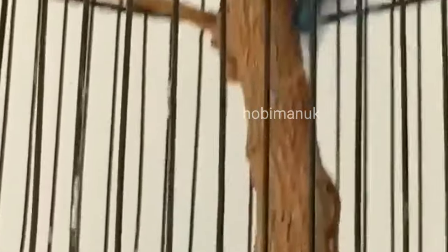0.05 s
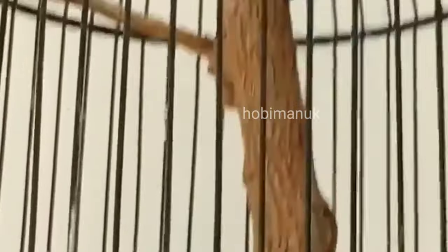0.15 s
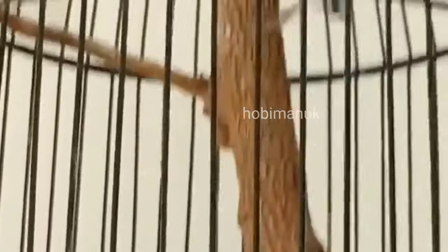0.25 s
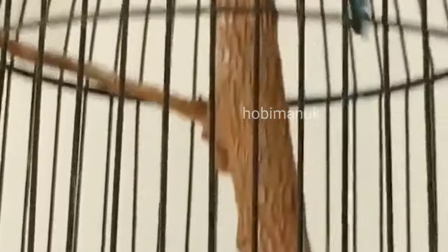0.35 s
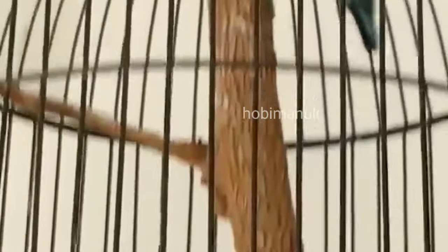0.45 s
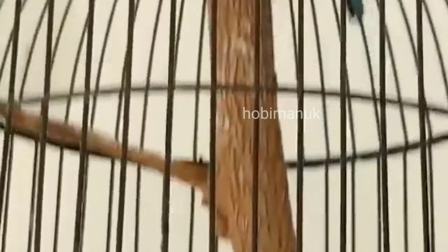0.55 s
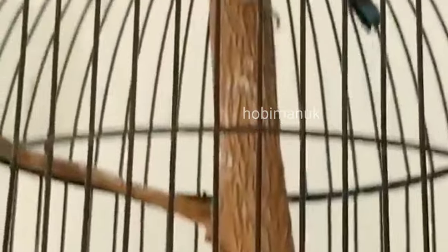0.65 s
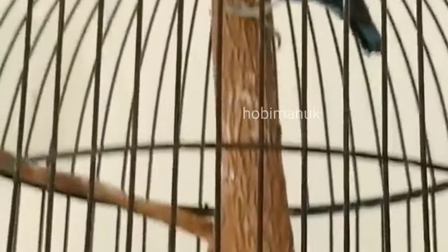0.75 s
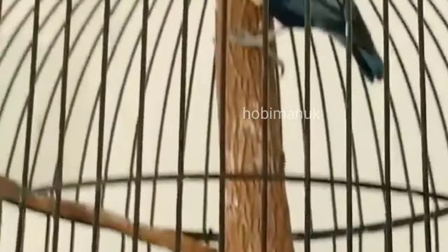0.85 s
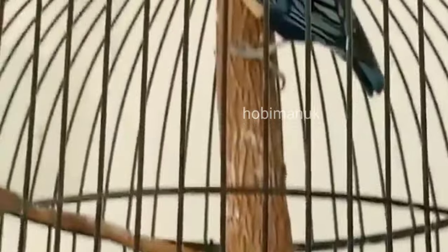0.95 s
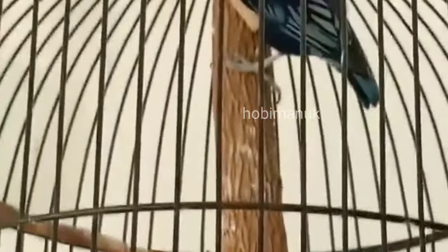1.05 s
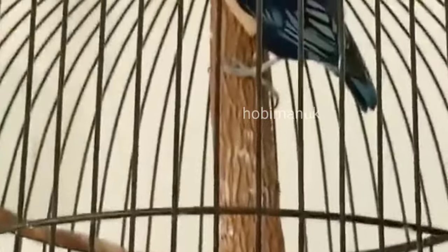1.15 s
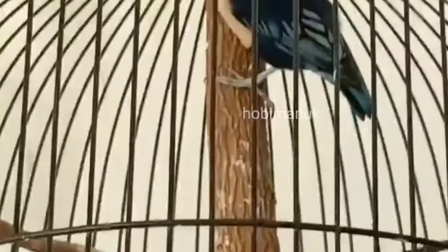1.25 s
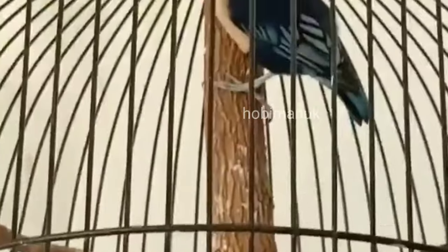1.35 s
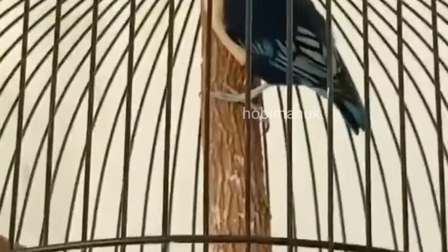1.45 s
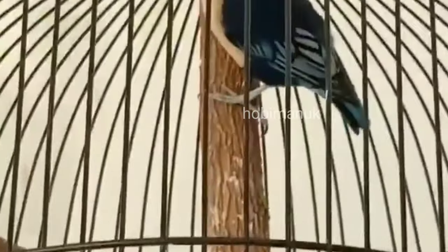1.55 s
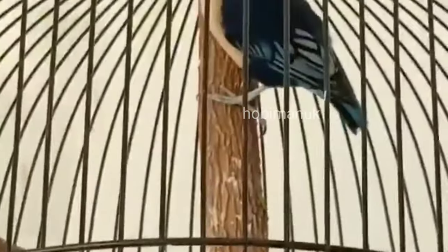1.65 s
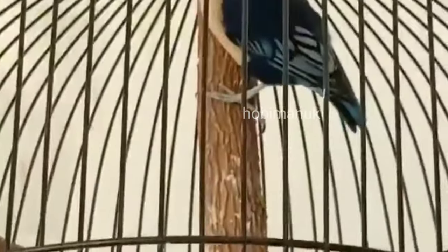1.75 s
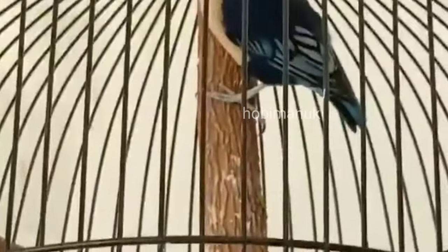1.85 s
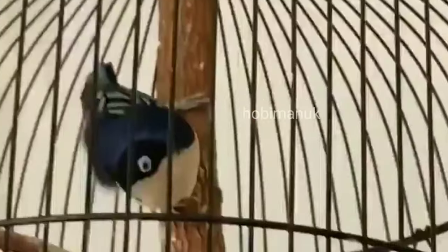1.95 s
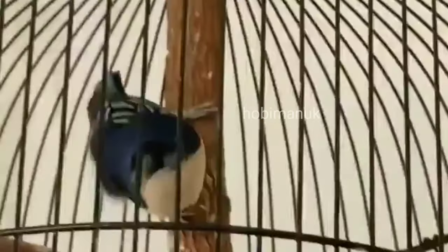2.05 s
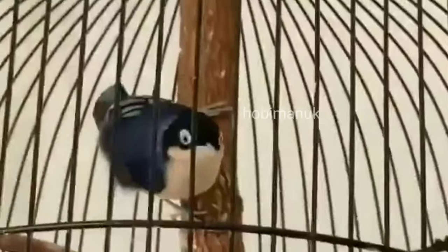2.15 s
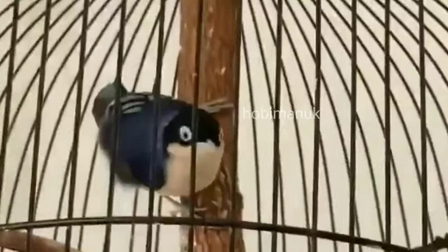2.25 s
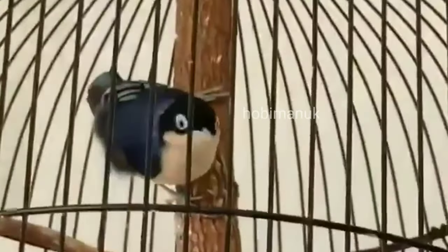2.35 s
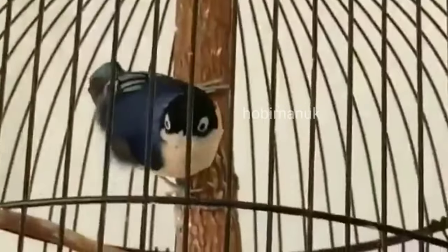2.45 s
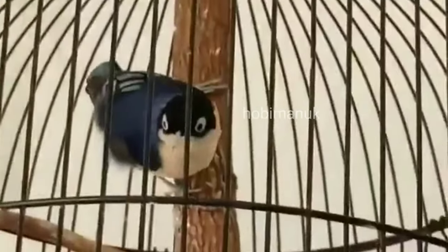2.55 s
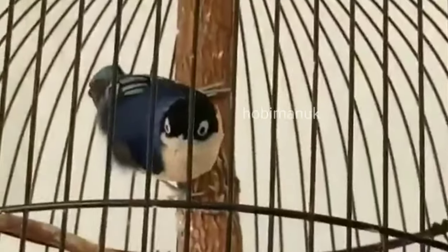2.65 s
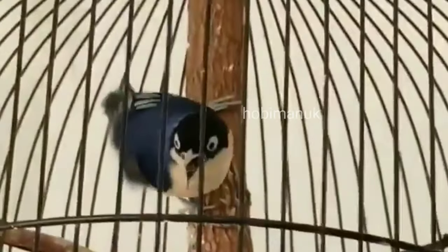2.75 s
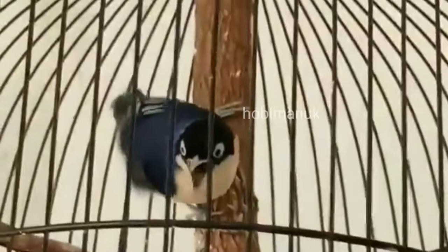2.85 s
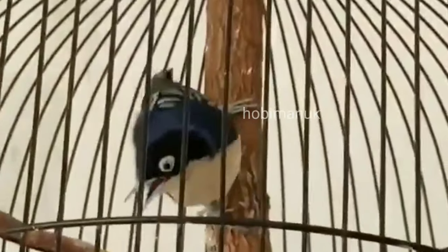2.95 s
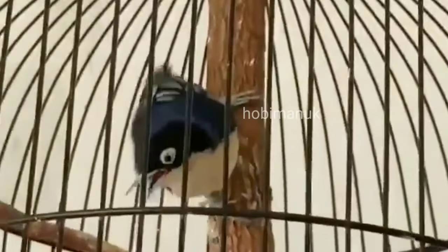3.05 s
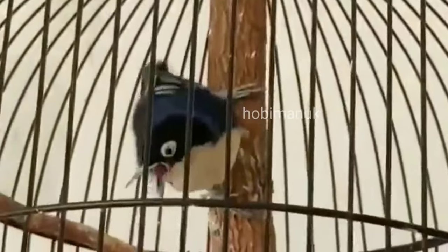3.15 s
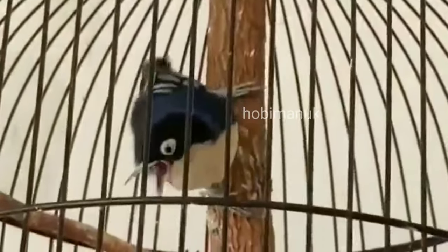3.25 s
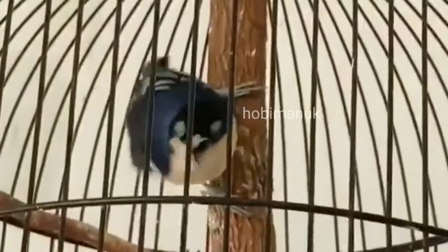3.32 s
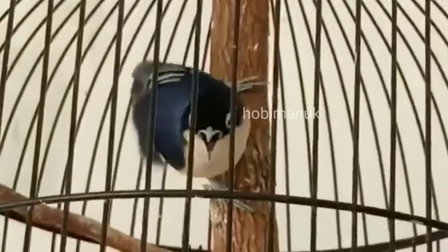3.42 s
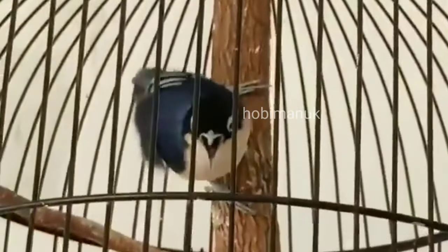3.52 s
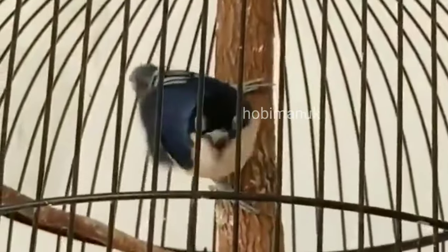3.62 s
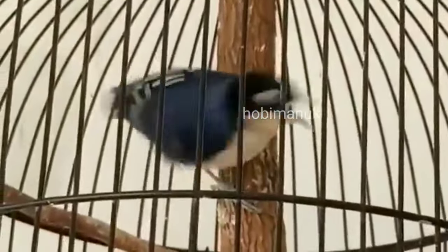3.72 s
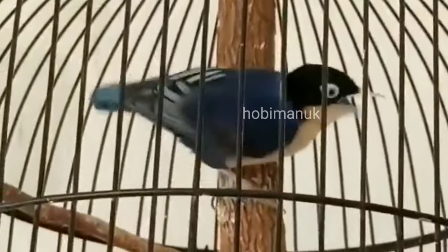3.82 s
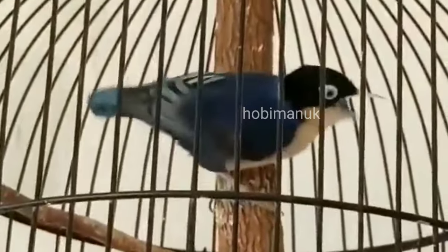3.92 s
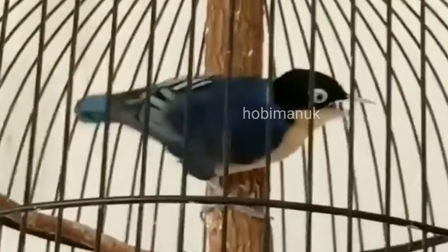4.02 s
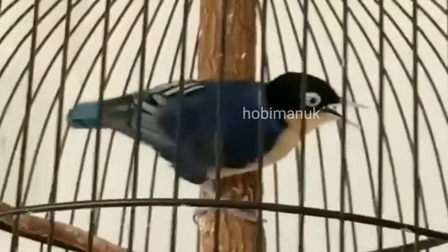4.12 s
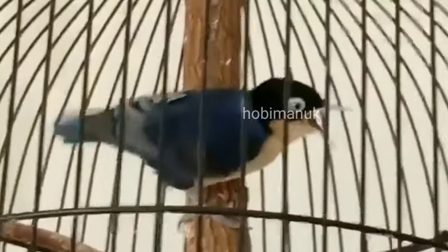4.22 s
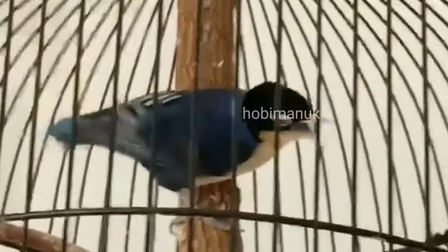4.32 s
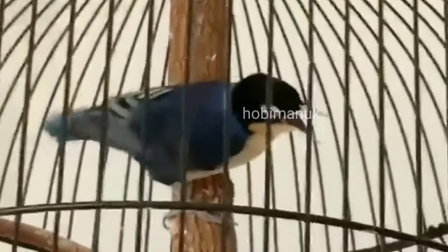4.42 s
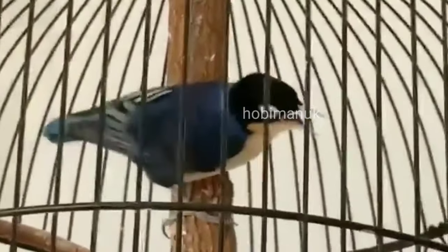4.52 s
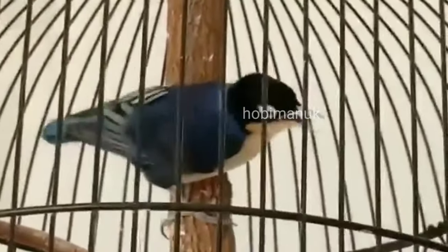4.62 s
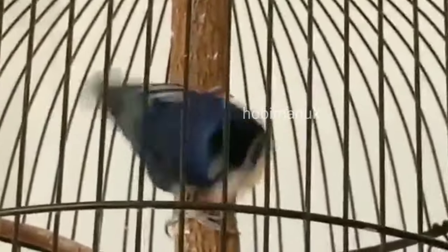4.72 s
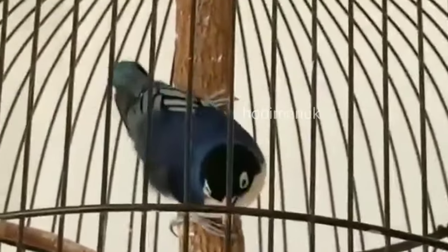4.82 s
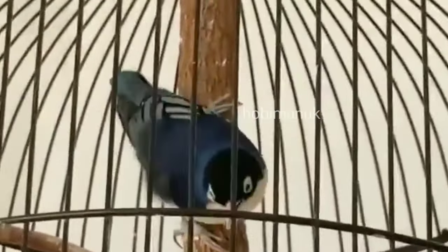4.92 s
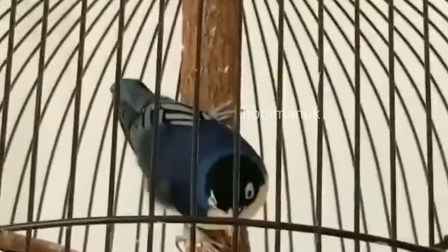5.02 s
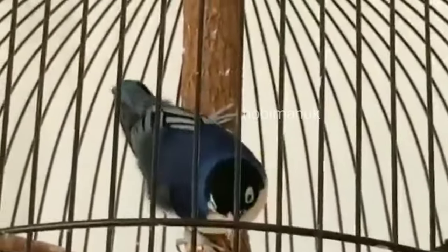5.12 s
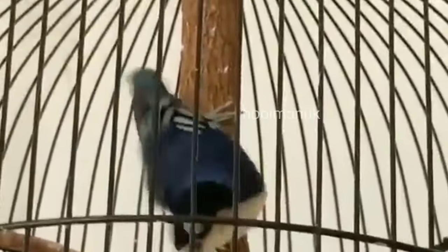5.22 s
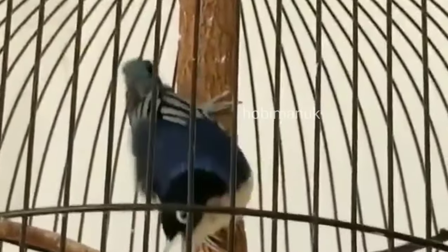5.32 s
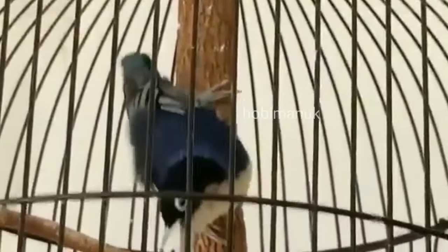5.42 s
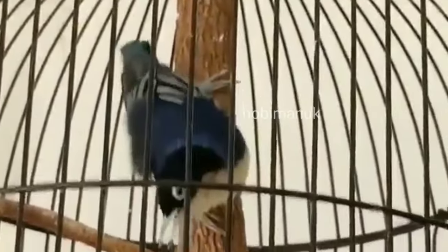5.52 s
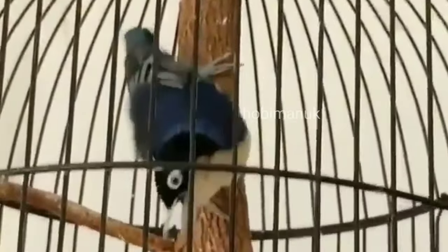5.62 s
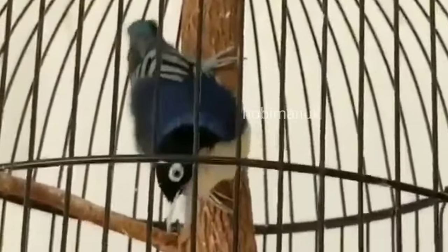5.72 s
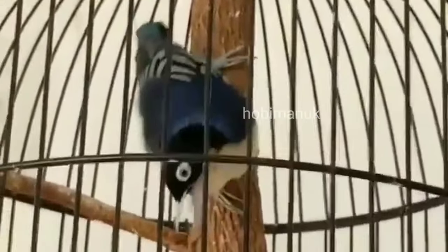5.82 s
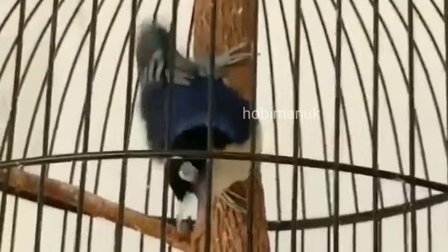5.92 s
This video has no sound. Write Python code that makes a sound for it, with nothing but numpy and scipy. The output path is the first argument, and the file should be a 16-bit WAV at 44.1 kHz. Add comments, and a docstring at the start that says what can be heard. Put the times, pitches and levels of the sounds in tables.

```python
"""A small caged bird close by sings three sets of three sharp chips, near-pure tones plunging in pitch.
Meanwhile distant hammer blows ring in an echoing space and other birds call faintly over dull noise.
At 1.9 s all but a faint microphone hiss drops out abruptly, then swells back with a low rumble.
From 2.8 s the bird trills on the same note, at times hoarsely, while the hammering goes on."""
import sys
import numpy as np
from scipy import signal
from scipy.fft import rfft, irfft, next_fast_len
from scipy.io import wavfile
from scipy.ndimage import uniform_filter1d, minimum_filter1d

SR = 44100
rng = np.random.default_rng(int(sys.argv[2]) if len(sys.argv) > 2 else 0)


def bounce(signal):
    """Save signal as a 16-bit WAV file at the path given by the first command-line argument."""
    frames = np.transpose(np.atleast_2d(signal))
    limited = np.clip(frames, -1, 1)
    pcm = np.round(limited * 32767).astype(np.int16)
    wavfile.write(sys.argv[1], SR, pcm)


N = 263277
TIME_S = np.arange(N) / SR
TAIL_S = TIME_S[:SR]
LEAD_S = .04  # start of a burst to its peak


def caged_bird(voice_db=33, room_db=-1.5, rasp_db=1, shimmer_db=-10.5, room_carryover=.91):
    """Each chip has a soft puff, hoarse ones a rasp; room echoes change gradually."""
    # Each row: centre in s, relative level in dB, pitch in Hz, length factor, hoarseness 0-1.
    chips = [(0.181, -7, 5860, 1.27, 0), (0.2645, -6, 5680, 0.89, 0), (0.3545, -6.5, 5690, 0.94, 0),
             (0.8568, -5, 5880, 1.06, 0), (0.9487, -7, 5800, 0.64, 0), (1.0521, -8.5, 5600, 0.74, 0),
             (1.557, -7.5, 5990, 1.13, 0), (1.651, -10, 5890, 0.85, 0), (1.7504, -8.5, 5640, 1.08, 0),
             (2.809, -8.5, 6360, 0.92, 0), (2.8854, -9, 6030, 0.85, 0), (2.967, -8.5, 5990, 0.84, 0),
             (3.0489, -9.5, 6050, 1.14, 0.06), (3.1344, -11.5, 6090, 0.9, 0),
             (3.2137, -11, 6090, 1.05, 0.16), (3.293, -14, 6130, 0.85, 0.14),
             (3.374, -12.5, 6310, 0.86, 0.55), (3.4563, -11.5, 5990, 0.83, 0.4),
             (3.5357, -12.5, 6150, 0.9, 0), (3.62, -11, 6060, 0.95, 0), (3.6996, -11, 6045, 0.86, 0.12),
             (3.778, -10.0, 6150, 0.7, 0), (3.8644, -13, 6240, 0.69, 0.48),
             (3.946, -12.5, 6100, 0.85, 0.41), (4.0307, -11, 6040, 1.17, 0.56),
             (4.1166, -11.3, 6030, 0.9, 0.5), (4.202, -10.5, 5930, 1.08, 0.55),
             (4.2883, -7.5, 5970, 0.87, 0.4), (4.3761, -11, 6140, 0.86, 0.5), (4.4612, -9, 5905, 0.95, 0.5),
             (4.549, -10, 5925, 1.1, 0.54), (4.6339, -9, 6020, 0.95, 0.3), (4.7187, -8, 6010, 0.95, 0.4),
             (4.811, -6.5, 6000, 0.85, 0.41), (4.903, -10.5, 5880, 1.12, 0.61),
             (4.9917, -7.5, 6090, 1.15, 0.43), (5.0869, -9.5, 6000, 1.15, 0.37),
             (5.1805, -7, 5920, 1.25, 0), (5.2751, -9, 5980, 1.25, 0.45), (5.3627, -9, 5940, 1.12, 0.06),
             (5.4563, -8.5, 5980, 1.2, 0), (5.55, -9, 5980, 1.15, 0), (5.649, -9.5, 5850, 1.32, 0),
             (5.7482, -11.5, 6000, 1.45, 0), (5.847, -10.5, 6000, 1.24, 0.04),
             (5.942, -10.5, 5810, 1.07, 0.25)]
    # Each row: time in s, depth factor of the chip's final dive.
    dives = [(.26, 0.95), (.4, 0.92), (4.9, 0.96), (5.0, 1.22), (5.28, 1.27), (5.37, 1)]
    # Head turns. Each row: time in s, left minus right in dB.
    facing = [(.3, 1.5), (.9, 2), (2.88, 2.3), (3.12, 2), (3.45, 1.5), (3.87, 0.5), (5.5, 1)]
    # Each row: time in s, relative puff level in dB.
    puffs = [(.3, -30.5), (1.65, -23), (2.89, -23), (3.1, -21.5), (3.85, -24), (4.9, -26), (5.9, -27)]
    click_db, clicks_until_s = -23.5, 2.85
    lowpass = signal.butter(16, 13200, fs=SR, output="sos")
    out, room = np.zeros((2, N)), None
    for s, db, hz, length, hoarse in chips:
        fresh = reverb(t60_s=.19, late_t60_s=1, late_db=-22.5, build_s=.0031)
        room = fresh if room is None else room_carryover * room + np.sqrt(1 - room_carryover ** 2) * fresh
        centre_s, tone = chip(hz, length, waver=.0079 + .03 * hoarse, start_db=7 * hoarse,
                              dive=lookup(dives, s))
        voice = from_db(rasp_db) * hoarse ** 3 * burst(4900, 7610, rise_s=.015, fall_s=.0024, order=5)
        add(voice, LEAD_S - centre_s, tone[None])
        voice = signal.sosfilt(lowpass, voice)
        path = cage_path(from_db(room_db) * room, pan_db=lookup(facing, s))
        # the overtone is beamed past the microphone, so more of it returns from the room
        shimmer = band(reverb(t60_s=.34, late_t60_s=.63, late_db=-15.5, build_s=.013), 11000, 13200)
        heard = signal.fftconvolve(voice, path + from_db(shimmer_db) * shimmer, axes=1)
        add(out, s - LEAD_S, from_db(db + voice_db) * heard / np.linalg.norm(heard))
        puff = from_db(lookup(puffs, s) + rng.standard_normal()) * burst(120, 720, .0029, .0039)
        # a brief mid-range click, no part of the bird's voice, is heard on the opening chips
        click = (s < clicks_until_s) * from_db(click_db) * burst(1300, 4900, .0018, .0017)
        pop = puff + click
        pop_in_room = from_db(-3) * signal.fftconvolve(pop, room[:, :SR // 4], axes=1)
        add(pop_in_room, 0, pop)
        add(out, s - LEAD_S, from_db(db) * pop_in_room)
    return out


def chip(hz, length, waver, start_db, dive, flutter_db=3, sparkle_db=5.5):
    """A plunging tone with a weak octave; returns its centre time in s and the sound."""
    # Each row: unstretched time from centre in s, pitch ratio before the dive factor.
    sweep = [(-.022, 1.39), (-.012, 1.28), (-.008, 1.17), (-.004, 1.07), (0, 1.0), (.003, .92),
             (.0055, .82), (.008, .76)]
    # Each row: unstretched time from centre in s, relative level in dB.
    swell = [(-.022, -65), (-.016, -37), (-.012, -27), (-.008, -15.5), (-.004, -5), (-.001, 1),
             (.002, -0.5), (.005, -12), (.008, -21)]
    # The octave is loudest near 12.8 kHz and falls steeply above. Each row: overtone in Hz, gain in dB.
    overtone = [(9000, -57), (10500, -36), (11800, -34), (12800, -24), (13400, -39.5), (14500, -58.5)]
    t = np.arange(sweep[0][0] * length, sweep[-1][0] * length, 1 / SR) / length
    depth = np.where(t > 0, dive, 1)
    pitch_hz = hz * lookup(sweep, t) ** depth * (1 + waver * wobble(len(t), top_hz=510))
    phase = 2 * np.pi * np.cumsum(pitch_hz) / SR
    octave_db = at_hz(overtone, 2 * pitch_hz) + sparkle_db * wobble(len(t), top_hz=365)
    tone = np.sin(phase) + from_db(octave_db) * np.sin(2 * phase)
    level_db = lookup(swell, t) / depth + start_db * np.clip(-t / .022, 0, 1)
    level_db += flutter_db * wobble(len(t), top_hz=410)
    return -t[0] * length, from_db(level_db) * tone * signal.windows.tukey(len(t), .1)


def burst(low_hz, high_hz, rise_s, fall_s, order=2):
    """A short swell of band noise: rasp, puff or click."""
    t = TIME_S[:int(2 * LEAD_S * SR)] - LEAD_S
    noise = rms_one(band(rng.standard_normal((1, len(t))), low_hz, high_hz, order))
    return noise * np.exp(-abs(t) / np.where(t < 0, rise_s, fall_s))


def cage_path(room, pan_db, direct_db=-3):
    """Room response plus direct sound and near reflections, which shift as the bird turns its head."""
    # Surfaces near the cage. Each row: mean delay in s, gain in dB.
    reflections = [(.0013, -4), (.0032, -8.5), (.0105, -14.5), (.016, -10.5)]
    path = room.copy()
    path[[0, 1], [rng.integers(1, 3), 0]] += from_db(direct_db)  # left arrives 1-2 samples late
    for delay_s, db in reflections:
        lags_s = abs(delay_s * (1 + .12 * rng.standard_normal()) + .0003 * rng.standard_normal(2))
        path[[0, 1], (lags_s * SR).astype(int)] += from_db(db) * rng.choice([-1, 1], 2)
    return path * from_db([[pan_db / 2], [-pan_db / 2]])


def hammer(body_hz=1300, damping_hz=1500, rise_s=.00393, treble_rise_s=.0062, thud_db=2.25):
    """Distant blows on one spot return nearly the same echoes: a solid knock, then a ringing tail."""
    # Each row: time in s, level in dB, low body gain in dB, upper edge in Hz, ringing gain in dB.
    blows = [(0.097, -27, 3, 8950, 5.5), (.629, -27, 4.5, 9100, 6.5), (1.166, -29.5, 6.5, 8900, 6),
             (1.69, -34, 7.5, 9000, 8), (2.954, -32, -7.5, 3520, -7), (3.527, -32, -7, 4000, -5),
             (4.626, -26.5, -10, 2540, -18), (5.219, -28.5, -4, 3540, -3), (5.775, -35, -0.5, 4000, -1.5)]
    # Each row: frequency in Hz, relative spectral density in dB.
    colour = [(60, -19.5), (120, -19.5), (190, 0.5), (350, -3), (500, -2.5), (750, -1.5), (1000, -6),
              (1300, -7), (1800, -9), (2500, -3.5), (3300, -11.5), (4200, -5.5), (6500, -13), (9000, -40),
              (15000, -58.5)]
    knock_db, knock_s = 2.5, .024
    knock = from_db(knock_db * np.exp(-TAIL_S / knock_s))
    envelope = knock * decay(t60_s=.83, late_t60_s=.98, late_db=-2)
    attack = 1 - np.exp(-(TAIL_S / rise_s) ** 2)
    out, echoes = np.zeros((2, N)), diffuse(colour, len(TAIL_S))
    for s, db, body_db, top_hz, ring_db in blows:
        thud = .95 * echoes + .3 * diffuse(colour, len(TAIL_S))
        thud = band(thud, 16, top_hz, order=3)
        thud += (from_db(body_db) - 1) * band(thud, 26, body_hz, order=1)
        dull = band(thud, 20, damping_hz, order=1)
        thud = dull + (thud - dull) * (1 - np.exp(-TAIL_S / treble_rise_s))
        echo_clumps = from_db(1.77 * wobble(len(TAIL_S), top_hz=71))
        blow = from_db(thud_db) * thud * envelope * echo_clumps + from_db(ring_db) * ringing()
        add(out, s - rise_s / 2, from_db(db) * blow * attack)
    return out


def ringing(vary_db=2, spread_rad=.27):
    """The decaying modes of one blow, each with random strength and stereo phase."""
    # Each row: frequency in Hz, relative level in dB, T60 in s.
    modes = [(249.7, -17.5, 1.1), (307, -9, 0.43), (410, -12, 0.86), (477, -12, .8), (525, -9, 0.71),
             (581, -5, 0.34), (647, -10, 0.67), (772, -4.5, 0.21), (828, -7.5, 0.33), (933, -3, .15),
             (986, -16.5, .8), (1083, -9.5, .45), (1270, -15, 0.41)]
    out = 0
    for hz, db, t60_s in modes:
        phase = 2 * np.pi * rng.random() + spread_rad * rng.standard_normal((2, 1))
        envelope = from_db(db + vary_db * rng.standard_normal() - 60 * TAIL_S / t60_s)
        out = out + envelope * np.sin(2 * np.pi * hz * TAIL_S + phase)
    return out


def answering_bird(start_s=2.162, gap_s=.0955, count=6, peak_s=2.405, peak_db=-20.5, fade_db_per_s2=101.5):
    """A far bird's even run of chips swells and fades, heard only as reverberation."""
    out = np.zeros((2, N))
    for s in start_s + gap_s * np.arange(count):
        db = peak_db - fade_db_per_s2 * (s - peak_s) ** 2
        centre_s, tone = chip(hz=5495, length=1.2, waver=.032, start_db=-17, dive=1.03)
        echoes = reverb(t60_s=.25, late_t60_s=1, late_db=-9.5, build_s=.0023)
        add(out, s - centre_s, from_db(db) * signal.fftconvolve(tone[None], echoes, axes=1))
    return out


def far_whistles(gain_db=18.5):
    """Hoarse, broken bird whistles, mostly rising, heard only as reverberation."""
    # Each row: start in s, length in s, start pitch in Hz, end pitch in Hz, relative level in dB.
    whistles = [(0.003, 0.071, 3980, 3980, -62.5), (1.059, 0.11, 2480, 3187, -45.5),
                (1.838, 0.1, 3636, 4100, -52), (3.304, 0.15, 2440, 3330, -46),
                (3.55, 0.11, 3070, 4410, -52)]
    out = np.zeros((2, N))
    for s, length_s, start_hz, end_hz, db in whistles:
        size = int(length_s * SR)
        hz = np.linspace(start_hz, end_hz, size) * (1 + .11 * wobble(size, top_hz=300))
        envelope = signal.windows.tukey(size, .5) * rms_one(from_db(5 * wobble(size, top_hz=91)))
        tone = envelope * np.sin(2 * np.pi * np.cumsum(hz) / SR)
        echoes = reverb(t60_s=.142, late_t60_s=1, late_db=-13, build_s=.0026)
        add(out, s, from_db(db + gain_db) * signal.fftconvolve(tone[None], echoes, axes=1))
    return out


def background():
    """Dull noise from all sides."""
    # Each row: time in s, level in dB.
    levels = [(0, -47.5), (1.92, -44), (2.1, -50), (2.3, -45), (2.78, -42), (2.86, -52), (4.2, -46.5),
              (5.97, -48)]
    # Each row: frequency in Hz, relative spectral density in dB.
    colour = [(25, -10.5), (70, 9.5), (110, 1.5), (175, -1), (300, -4), (700, -3.5), (1300, -4.5),
              (2600, -3), (4000, -8), (7000, -15), (12000, -31.5), (16000, -56.5)]
    return gain_curve(levels) * diffuse(colour, next_fast_len(N))[:, :N]


def rumble():
    """Low noise that swells in the pause before the trill."""
    # Each row: time in s, level in dB.
    levels = [(0, -56), (1.9, -82), (2.15, -45.5), (2.5, -39), (2.78, -39), (2.86, -65), (5.97, -60.5)]
    # Each row: frequency in Hz, relative spectral density in dB.
    colour = [(22, -8), (35, -28), (70, -5.5), (108, -18), (150, -8), (178, 1), (215, -4), (320, -8.5),
              (440, -8), (850, -15.5), (2000, -22.5), (5000, -82)]
    return gain_curve(levels) * diffuse(colour, next_fast_len(N))[:, :N]


def microphone_hiss(low_hz=9530, high_hz=13600):
    """Faint, high noise of the microphone."""
    # Each row: time in s, gain in dB.
    gains = [(0, -51.5), (2, -53), (2.75, -53), (2.9, -52.5), (5.97, -57.5)]
    return gain_curve(gains) * band(rng.standard_normal((2, N)), low_hz, high_hz)


def diffuse(colour, size):
    """Stereo noise from all sides, alike in the bass, unrelated in the treble; rms 1."""
    # Each row: frequency in Hz, channel correlation 0-1.
    likeness = [(50, .72), (200, .84), (500, .7), (1000, .45), (2000, .25), (5000, .05)]
    hz = np.fft.rfftfreq(size, 1 / SR)
    alike = at_hz(likeness, hz)
    mid, side = rfft(rng.standard_normal((2, size)))
    pair = np.sqrt(1 + alike) * mid + np.sqrt(1 - alike) * side * [[1], [-1]]
    return rms_one(irfft(pair * from_db(at_hz(colour, hz)), size))


def reverb(t60_s, late_t60_s, late_db, build_s):
    """Dense stereo echoes that build up and die; unit energy."""
    build = 1 - np.exp(-(TAIL_S / build_s) ** 2)
    echoes = rng.standard_normal((2, len(TAIL_S))) * decay(t60_s, late_t60_s, late_db) * build
    return rms_one(echoes) / np.sqrt(len(TAIL_S))


def decay(t60_s, late_t60_s, late_db):
    """An early decay plus a longer, weaker one."""
    return np.hypot(from_db(-60 * TAIL_S / t60_s), from_db(late_db - 60 * TAIL_S / late_t60_s))


def wobble(size, top_hz):
    """Smooth random wavering; rms 1."""
    return rms_one(band(rng.standard_normal(size), top_hz / 4, top_hz))


def band(x, low_hz, high_hz, order=2):
    return signal.sosfilt(signal.butter(order, [low_hz, high_hz], "band", fs=SR, output="sos"), x)


def add(out, start_s, sound):
    start = max(int(start_s * SR), 0)
    part = sound[:, :N - start]
    out[:, start:start + part.shape[1]] += part


def lookup(rows, x):
    return np.interp(x, *np.transpose(rows))


def at_hz(rows, hz):
    """Interpolate on a log-frequency axis."""
    row_hz, values = np.transpose(rows)
    return np.interp(np.log(hz + 1), np.log(row_hz), values)


def gain_curve(rows):
    return from_db(lookup(rows, TIME_S))


def from_db(db):
    return 10 ** (np.asarray(db) / 20)


def rms_one(x):
    return x / np.sqrt(np.mean(x ** 2) + 1e-20)


def scene():
    """Everything but the hiss passes through the dropout."""
    # Each row: time in s, gain in dB.
    dropout = [(1.917, -4.5), (1.923, -27), (2.05, -17.5), (2.17, -5.5), (2.3, -2)]
    ambience = background() + rumble()
    hiss = microphone_hiss()
    birds = caged_bird() + answering_bird() + far_whistles()
    return (birds + hammer() + ambience) * gain_curve(dropout) + hiss


def record(dry):
    """A limiter dips smoothly around peaks above full scale; a low-pass cuts the top."""
    window_samples, cutoff_hz = 90, 15900
    gain = np.minimum(1, 1 / (abs(dry).max(axis=0) + 1e-9))
    gain = uniform_filter1d(minimum_filter1d(gain, size=2 * window_samples), size=window_samples)
    return signal.sosfilt(signal.cheby2(14, 70, cutoff_hz, fs=SR, output="sos"), dry * gain)


dry = scene()
out = record(dry)
bounce(out)
```